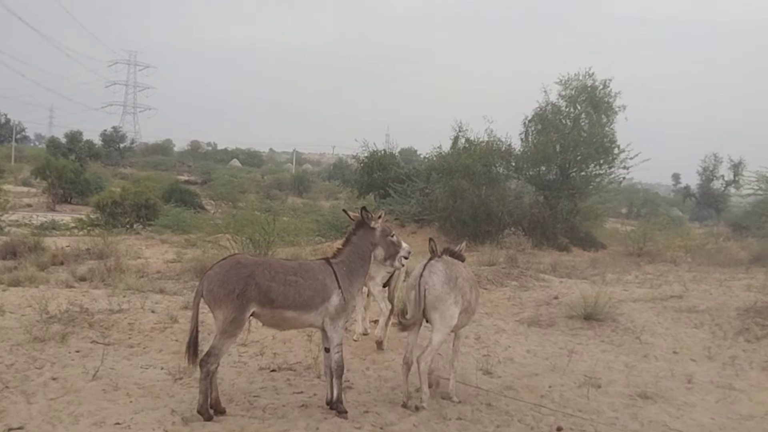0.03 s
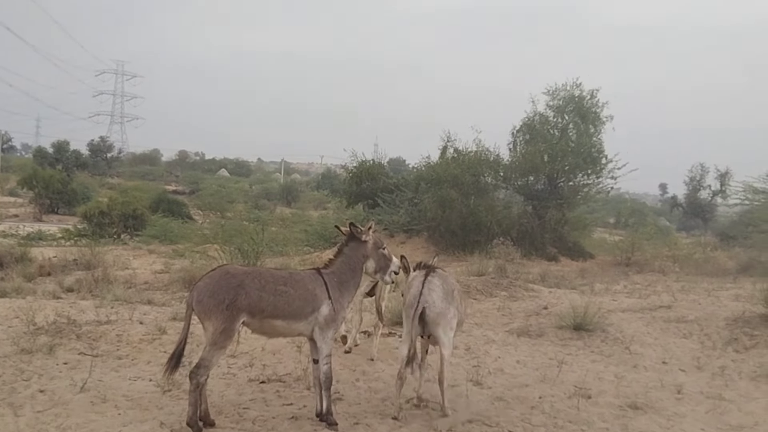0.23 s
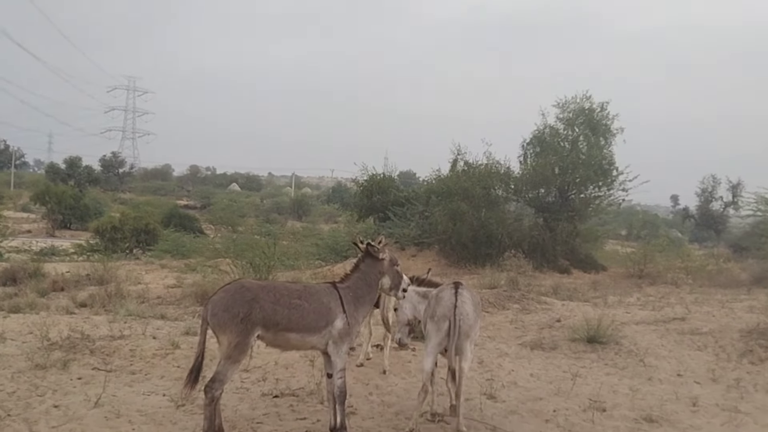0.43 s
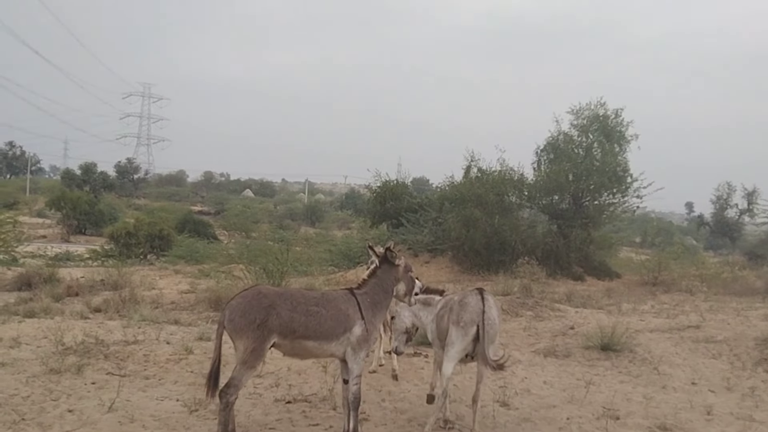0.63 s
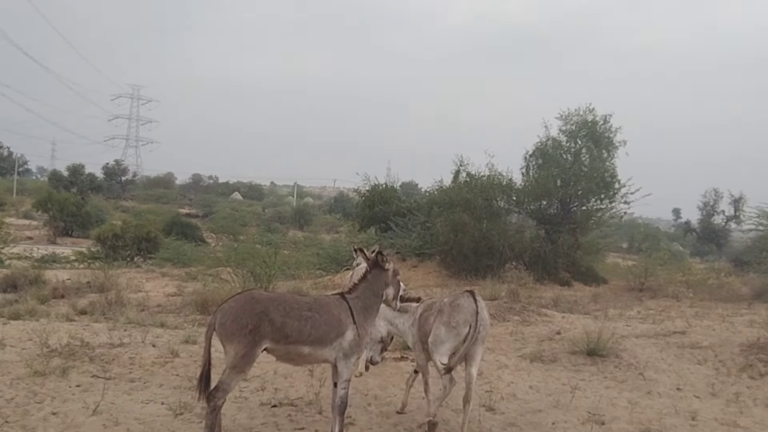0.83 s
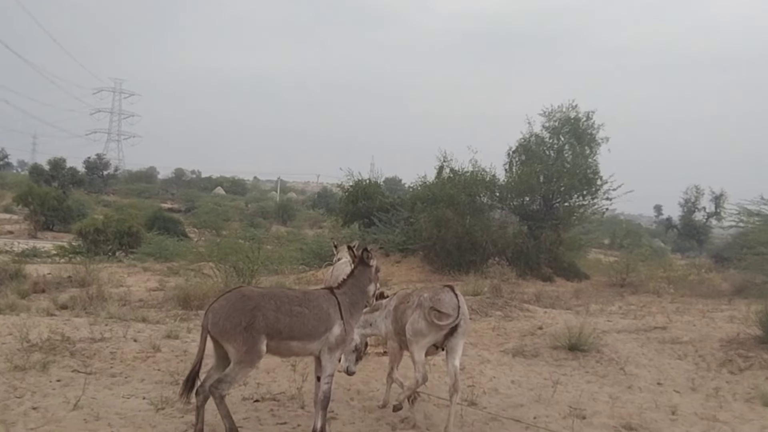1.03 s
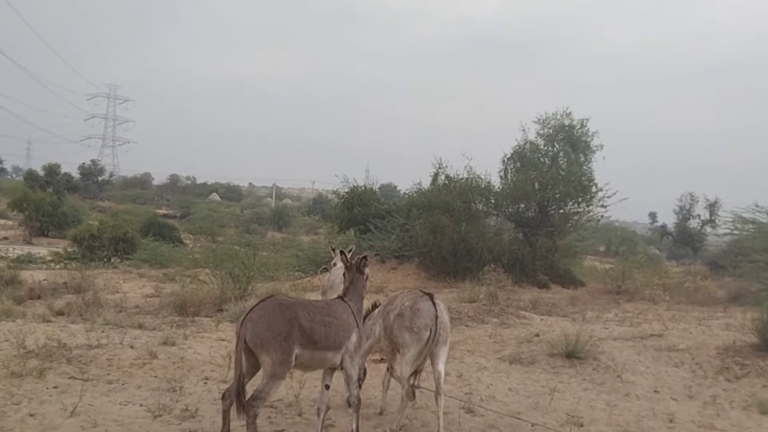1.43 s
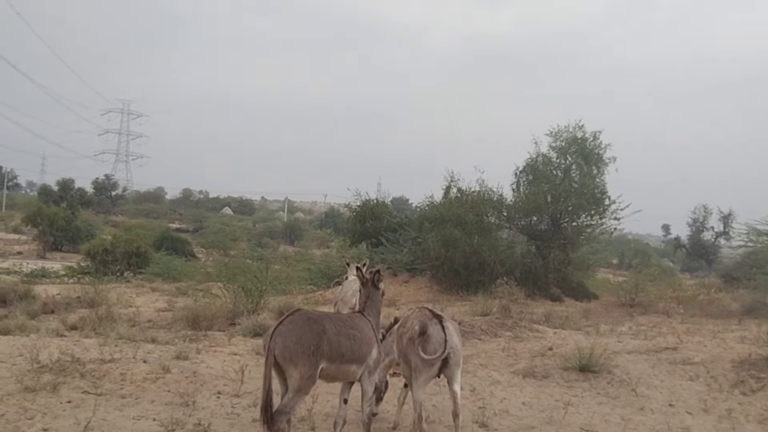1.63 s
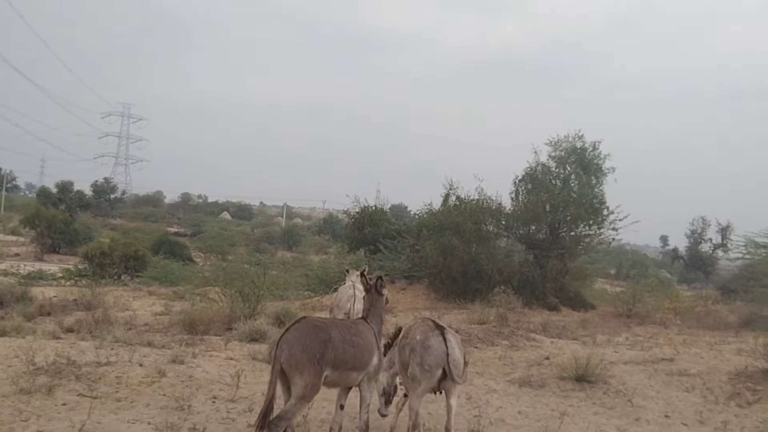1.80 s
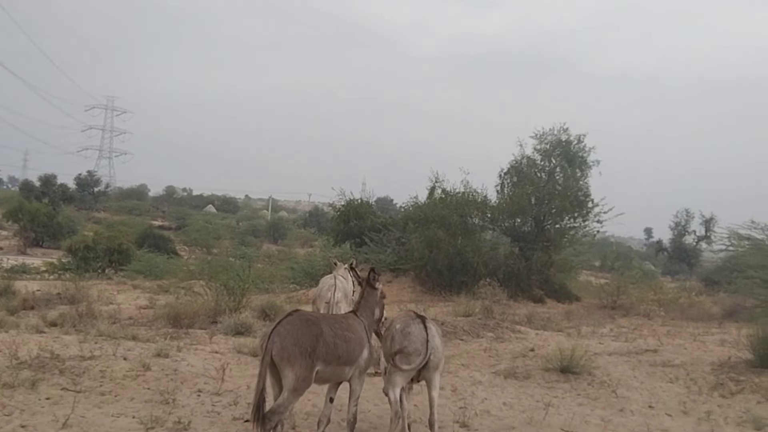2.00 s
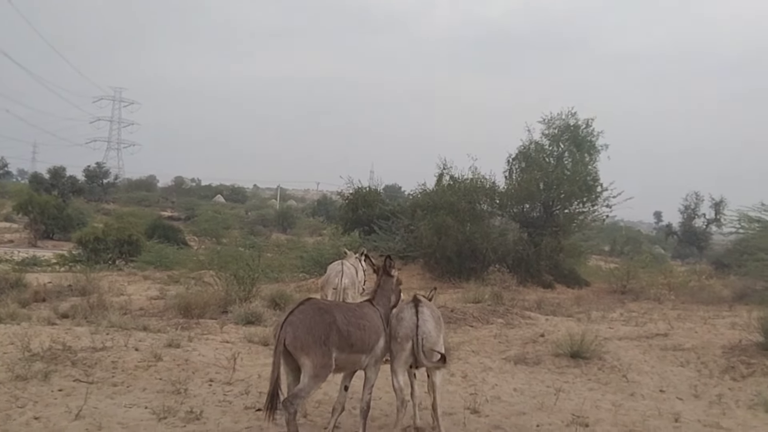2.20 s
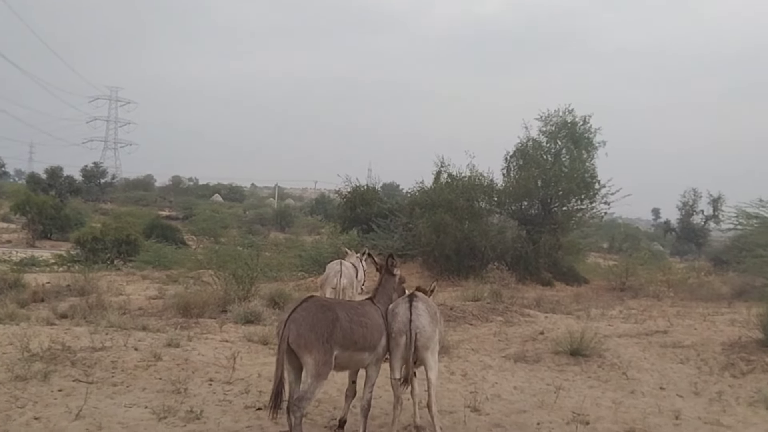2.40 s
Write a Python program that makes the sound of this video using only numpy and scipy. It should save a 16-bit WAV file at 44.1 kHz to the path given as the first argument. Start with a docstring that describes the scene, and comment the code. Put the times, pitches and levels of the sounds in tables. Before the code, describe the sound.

A donkey brays in open scrubland. High, wheezy, whistling in-breaths come at the start and at about 0.8, 1.4 and 2.1 seconds, the first and third over a thin moan. Loud, harsh, rattling out-breaths fall between them at 0.3, 1.0 and 1.7 seconds. A low grunt starts at 2.5 seconds. Bushes echo faintly. Wind rumbles on the microphone from one second, bumping near 2.0 and 2.4.

```python
"""Open scrubland: a donkey brays, four whistling in-breaths (hee) around three loud out-breaths (haw).
Hees are air drawn through a narrowed throat; haws are rattling vocal folds ringing throat and mouth.
A thin moan arches under the first and third hee, and a low grunt starts at the end.
The bushes echo faintly over still air; from one second on, wind bumps the microphone."""
import sys
import numpy as np
from scipy import signal
from scipy.fft import rfft, irfft, next_fast_len
from scipy.io import wavfile
from scipy.ndimage import uniform_filter1d

SR = 44100
rng = np.random.default_rng(int(sys.argv[2]) if len(sys.argv) > 2 else 0)


def dump(signal):
    """Clip the signal to [-1, 1] and save it as 16-bit WAV at the path in sys.argv[1]."""
    limited = np.clip(np.atleast_2d(signal).T, -1, 1)
    pcm = np.round(limited * 32767).astype(np.int16)
    wavfile.write(sys.argv[1], SR, pcm)


N = 112454
TIME_S = np.arange(N) / SR

# in-breaths: start_s, end_s, level_db, release_s
HEES = [(.005, 0.203, -38, 0.028), (0.756, 0.945, -32.5, 0.033), (1.418, 1.719, -36.5, 0.11),
        (2.077, 2.435, -37.5, 0.4)]
# air in the narrowed throat: freq_hz, relative_db
AIR_SPECTRUM = [(680, -35), (1000, 0.5), (2000, 7), (2250, -13), (2700, 8), (3300, -11.5), (4600, -4),
                (7300, -24.5), (9300, -28.5), (10800, -43.5), (14000, -37.5)]
# hee whistles: start_s, end_s, top_pitch_hz, level_db, hoarseness (0-1)
WHISTLES = [(-.01, 0.083, 4942, -33, 0.2), (.01, 0.062, 2665, -30.5, 0.58),
            (0.046, 0.113, 1954, -23.5, 0.1), (0.059, 0.21, 4580, -44.5, 0.97),
            (0.117, 0.212, 1962, -30, 0.18), (.18, 0.207, 4020, -38, 0.7), (0.735, 0.797, 5250, -38, 0.82),
            (0.78, 0.859, 4969, -30, 0.02), (0.744, 0.787, 2606, -25.5, 0.15),
            (0.764, 0.857, 2002, -30, 0.7), (0.831, 0.922, 1979, -19, 0.04), (.87, 0.946, 4693, -42.5, 0.7),
            (1.446, 1.597, 5023, -34.5, 0.15), (1.437, 1.516, 2616, -28.5, 0.72),
            (1.509, 1.675, 1975, -29.5, 0.57), (2.061, 2.348, 4895, -47.5, 0.61),
            (2.075, 2.132, 2670, -38.5, 0.18), (2.119, 2.158, 1941, -28.5, 0.2),
            (2.184, 2.337, 1918, -31, 0.2)]
# one curve per moan: time_s, pitch_hz, level_db
MOANS = [
    [(0, 509, -46.5), (.06, 467, -41), (.12, 332, -47.5)],
    [(.12, 420, -51.5), (.18, 516, -42), (.265, 476, -40)],
    [(1.38, 339.2, -46.5), (1.49, 516.3, -46), (1.57, 505, -43), (1.68, 332.6, -47)],
]
# per moan: overtone_to_fundamental_ratio
MOAN_REEDINESS = [.2, .3, .7]
# one curve per haw: time_s, pitch_hz
HAW_PITCH = [
    [(.27, 263.3), (.292, 287.2), (.41, 237.5), (.458, 257.1), (.5, 263.4), (.535, 290.6), (.575, 298),
     (.63, 266)],
    [(1.0, 264.4), (1.03, 297.8), (1.096, 267.6), (1.16, 265.5), (1.25, 297.8), (1.3, 272.6)],
    [(1.74, 254.2), (1.768, 281.2), (1.815, 273), (1.843, 242), (1.957, 288), (1.97, 247)],
]
# one curve per haw: time_s, mid_db, bass_db, treble_db
HAW_LEVELS = [
    [(.268, -16.5, -29.5, -19.5), (.345, -18.5, -29.5, -25.5), (.42, -18.5, -29.5, -23.5),
     (.53, -15.5, -31, -26), (.598, -12.5, -34.5, -18.5), (.625, -23.5, -45, -30), (.65, -46, -42, -70)],
    [(.995, -17, -27, -22), (1.12, -21.5, -28.5, -21.5), (1.22, -20, -27, -25), (1.278, -16, -26.5, -19),
     (1.33, -40.5, -47, -34.5)],
    [(1.735, -20, -25.5, -27), (1.8, -22.5, -26.5, -29), (1.9, -17.5, -29, -27.5),
     (1.97, -18.5, -29.5, -25), (2.0, -48, -37, -60)],
]
# folds rattle, then steady briefly late in each haw: time_s, roughness (0-1)
HAW_ROUGHNESS = [(.345, .6), (.41, 1), (.5, .55), (.535, .08), (.585, .08), (.615, .8), (1.03, .5),
                 (1.17, .75), (1.24, .1), (1.31, .6), (1.83, .9), (1.9, .3), (1.98, .7)]
# throat catches and surges: time_s
SURGES_S = [0.272, 0.333, 0.353, 1.085, 1.748, 1.791, 1.831]
# throat and open mouth: freq_hz, gain_db
THROAT_RESPONSE = [(130, -34), (280, -11.5), (500, -11.5), (660, -28.5), (820, -8.5), (1060, 7),
                   (1300, 1.5), (1650, -9.5), (1900, -16), (2130, -9.5), (2450, -21.5), (2800, -23),
                   (4000, -44), (7000, -52), (10000, -72.5), (14000, -66.5)]
# wind on the microphone: time_s, level_db
WIND_LEVEL = [(.93, -98), (1.02, -42.5), (1.3, -48.5), (1.35, -40)]
# wind rumble: freq_hz, relative_db
WIND_SPECTRUM = [(25, -42), (70, 6), (120, 12.5), (300, -3.5), (600, -61.5)]
# single wind buffets: time_s, peak_db
BUFFETS = [(2.042, -23.5), (2.377, -26)]
# reflection off the bushes: freq_hz, gain_db
ECHO_RESPONSE = [(420, 7.5), (900, -15.5), (4900, 10), (7000, -5.5)]
# still air: freq_hz, relative_db
STILL_AIR_SPECTRUM = [(60, -16.5), (650, -6), (1600, 5.5), (3500, -16), (12000, -41)]


def from_db(db):
    """Decibels to gain."""
    return 10 ** (np.asarray(db) / 20)


def unit_rms(x):
    """Scale to rms 1."""
    return x / np.sqrt(np.mean(x ** 2) + 1e-20)


def even(x):
    """Hold the short-term rms at 1."""
    return x / np.sqrt(uniform_filter1d(uniform_filter1d(x ** 2, 850), 425) + 1e-14)


def curves(rows):
    """Each value column at every sample."""
    times_s, *columns = np.transpose(rows)
    return [np.interp(TIME_S, times_s, column) for column in columns]


def swell(start_s, end_s, attack_s, release_s):
    """Linear attack, hold, release."""
    return np.clip((TIME_S - start_s) / attack_s, 0, 1) * np.clip((end_s - TIME_S) / release_s, 0, 1)


def gate(rows, attack_s, fade_s=.014):
    """Open from a curve's first point to its last."""
    return swell(rows[0][0], rows[-1][0] + fade_s / 2, attack_s, fade_s)


def drift(rate_hz):
    """Smooth random motion, rms 1."""
    pole = np.exp(-2 * np.pi * rate_hz / SR)
    return unit_rms(signal.lfilter([1], [1, -2 * pole, pole * pole], rng.standard_normal(N + SR))[SR:])


def colour(x, spectrum):
    """Minimum-phase filter with the given spectrum."""
    size = next_fast_len(N + SR) * 2
    hz, db = np.transpose(spectrum)
    bins_hz = np.maximum(np.arange(size // 2 + 1) * SR / size, 1)
    gain = from_db(np.interp(np.log(bins_hz), np.log(hz), db))
    cepstrum = irfft(np.log(gain))
    cepstrum[1:size // 2] *= 2
    cepstrum[size // 2 + 1:] = 0
    return irfft(rfft(x, size) * np.exp(rfft(cepstrum)))[:N]


def band(x, hz, kind):
    """Fourth-order low- or high-pass."""
    return signal.sosfilt(signal.butter(4, hz, kind, fs=SR, output="sos"), x)


def reflections(x, t60_s, peak_s=0):
    """Convolve with unit-energy noise that fades either side of peak_s."""
    tail = rng.standard_normal(N) * from_db(-60 * np.abs(TIME_S - peak_s) / t60_s)
    return signal.fftconvolve(x, tail / np.sqrt(np.sum(tail ** 2)))[:N]


def hees(sag=.055, arch_below_hz=2300, overtone_limit_hz=10200):
    """Air rushes in through the narrowed throat and breaks into whistles: low ones arch, high ones sag."""
    air = even(colour(rng.standard_normal(N), AIR_SPECTRUM)) * from_db(2 * drift(37))
    out = air * sum(from_db(db) * swell(start_s, end_s, .037, release_s)
                    for start_s, end_s, db, release_s in HEES)
    waver_hz = 28 * drift(45)
    fray = drift(170) + 1j * drift(170)  # spreads a tone into a hoarse band
    for start_s, end_s, top_hz, db, hoarse in WHISTLES:
        length_s = end_s - start_s
        progress = np.clip((TIME_S - start_s) / length_s, 0, 1)
        droop = (2 * progress - 1) ** 2 if top_hz < arch_below_hz else progress
        pitch_hz = top_hz * (1 - sag * droop) + waver_hz
        phasor = np.exp(2j * np.pi * np.cumsum(pitch_hz) / SR)
        tone = phasor * (np.sqrt(2 * (1 - hoarse)) + np.sqrt(hoarse) * fray)
        overtones = sum(phasor ** k / k for k in (2, 3) if k * top_hz < overtone_limit_hz)
        whistle = even(np.real(tone + from_db(-28.5) * fray * overtones))
        out += from_db(db) * swell(start_s, end_s, .018, length_s / 4) * whistle
    return out


def moans():
    """Soft voice gliding in arcs, from hollow to reedy."""
    out = 0
    for rows, reediness in zip(MOANS, MOAN_REEDINESS):
        glide_hz, db = curves(rows)
        pitch_hz = uniform_filter1d(glide_hz, 1500) * (1 + .01 * drift(60))
        phase = 2 * np.pi * np.cumsum(pitch_hz) / SR
        tone = np.sin(phase) + reediness * sum(np.sin(k * phase) for k in range(2, 6))
        out += gate(rows, attack_s=.014) * from_db(db) * unit_rms(tone)
    return out


def vocal_folds(pitch_hz, roughness, jitter_s=.00017, shimmer_db=3, rasp=.8):
    """One pulse and air puff a cycle; rough folds beat unevenly, alternately strong and weak."""
    cycles = np.cumsum(pitch_hz * (1 + .012 * roughness * drift(50))) / SR
    count = np.arange(1, int(cycles[-1]))
    position = np.interp(count, cycles, np.arange(N))
    pulse_roughness = np.interp(position, np.arange(N), roughness)
    jitter, shimmer = pulse_roughness * rng.standard_normal((len(count), 2)).T
    alternation = .45 * (-1) ** count * pulse_roughness
    position = np.clip(position + SR * jitter_s * (jitter + alternation), 0, N - 2)
    strength = from_db(shimmer_db * shimmer) * (1 + alternation)
    pulses = np.zeros(N)
    pulses[position.astype(int)] = strength * (1 - position % 1)
    pulses[position.astype(int) + 1] += strength * (position % 1)
    pulses = unit_rms(pulses)
    softened = uniform_filter1d(pulses, 20)  # slack folds close softly
    pulses = (1 - roughness) * pulses + roughness * softened
    puffs = unit_rms(rng.standard_normal(N) * np.exp(-1.3 * (cycles % 1)))
    return band(pulses, 4500, "low") + rasp * roughness * puffs + band(puffs, 3000, "high")


def haws(ring_harmonic=4, ring_half_width_hz=35, surge_width_s=.008):
    """Rattling folds ring the throat, which sings on one harmonic when they steady or surge."""
    pitch_hz, = curves(sum(HAW_PITCH, []))
    roughness, = curves(HAW_ROUGHNESS)
    voice = colour(vocal_folds(pitch_hz, roughness), THROAT_RESPONSE)
    # narrow band-pass tracking the harmonic
    phasor = np.exp(2j * np.pi * ring_harmonic * np.cumsum(pitch_hz) / SR)
    baseband = signal.lfilter(*signal.butter(1, ring_half_width_hz, fs=SR), voice / phasor)
    ring = 2 * np.real(phasor * baseband)
    surge = 1 + .5 * sum(np.exp(-((TIME_S - at_s) / surge_width_s) ** 2) for at_s in SURGES_S)
    ringing_voice = voice + 1.3 * (surge - roughness) * ring
    mid = surge * even(band(band(ringing_voice, 963, "high"), 1704, "low"))
    bass = even(band(voice, 663, "low"))
    treble = even(band(voice, 1598, "high"))
    out = 0
    for rows in HAW_LEVELS:
        haw = sum(from_db(db) * part for db, part in zip(curves(rows), (mid, bass, treble)))
        out += gate(rows, attack_s=.006) * haw
    return out


def wind(buffet_hz=129.3, buffet_width_s=.0059):
    """Wind on the microphone: lumpy rumble and two single buffets."""
    db, = curves(WIND_LEVEL)
    rumble = colour(rng.standard_normal(N), WIND_SPECTRUM) * from_db(3.3 * drift(18))
    out = from_db(db) * unit_rms(rumble)
    for at_s, peak_db in BUFFETS:
        offset_s = TIME_S - at_s
        envelope = np.exp(-(offset_s / buffet_width_s) ** 2)
        out += from_db(peak_db) * envelope * np.cos(2 * np.pi * buffet_hz * offset_s)
    return out


def grunt(start_s=2.516, attack_s=.018, pitch_hz=151, level_db=-32):
    """A slack, dark out-breath through the same throat."""
    voice = colour(vocal_folds(np.full(N, pitch_hz), roughness=np.ones(N)), THROAT_RESPONSE)
    dark = voice + 3 * band(voice, 600, "low")
    return from_db(level_db) * even(dark) * np.clip((TIME_S - start_s) / attack_s, 0, 1)


def airway(x, spacing_hz=690, feedback=.45):
    """Echoes along the long airway ring at evenly spaced treble frequencies."""
    lag = int(SR / spacing_hz)
    treble = band(x, 3500, "high")
    ringing = signal.lfilter([1], np.r_[1, np.zeros(lag - 1), -feedback], treble)
    return x - treble + ringing


def near_scatter(x):
    """Early reflections off the ground and other animals smear the treble."""
    return from_db(-7.5) * reflections(band(x, 1700, "high"), t60_s=.06)


def scrub_echo(x):
    """Faint scatter from the bushes, strongest from a big clump behind the donkey."""
    return from_db(-28) * colour(reflections(x, t60_s=.45, peak_s=.16), ECHO_RESPONSE)


def scene():
    """Donkey, echo, wind and still air, in mono."""
    bray = airway(hees() + moans() + haws() + grunt())
    donkey = band(bray + near_scatter(bray), 180, "high")
    still_air = from_db(-50.5) * unit_rms(colour(rng.standard_normal(N), STILL_AIR_SPECTRUM))
    return (donkey + scrub_echo(donkey) + wind() + still_air)[None]


def record(dry):
    """Steep low-pass at 15.6 kHz."""
    return signal.sosfilt(signal.ellip(10, .1, 80, 15600, fs=SR, output="sos"), dry)


dry = scene()
out = record(dry)
dump(out)
```